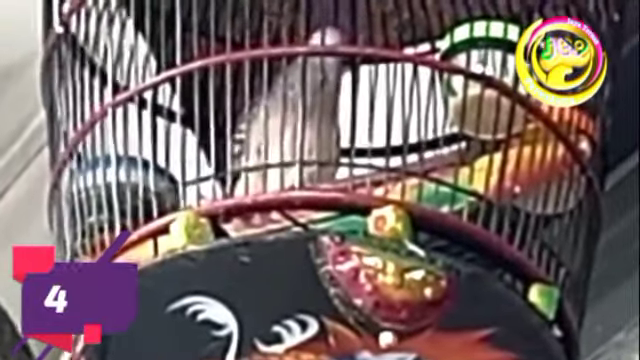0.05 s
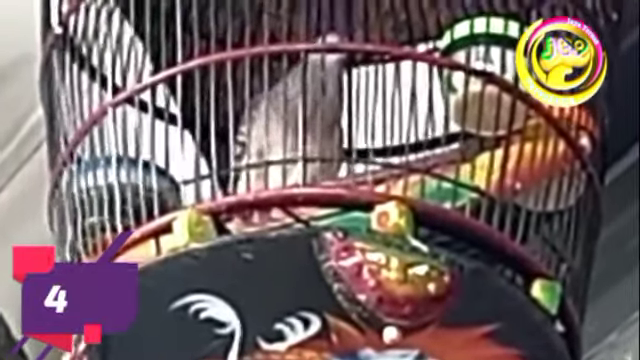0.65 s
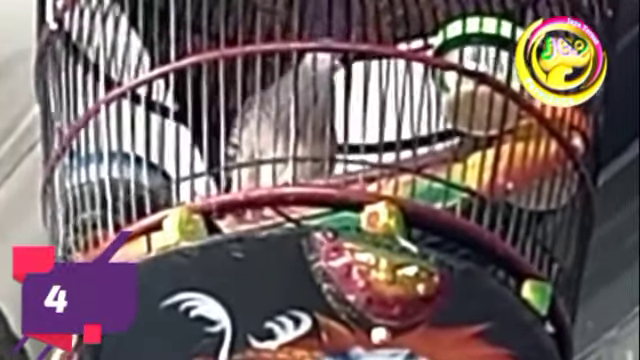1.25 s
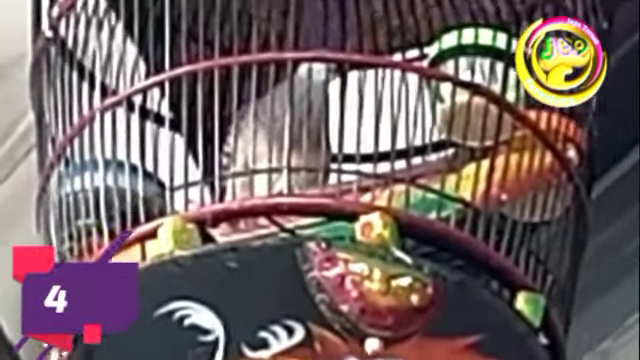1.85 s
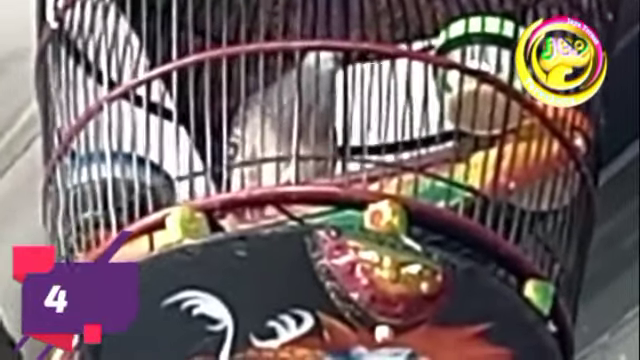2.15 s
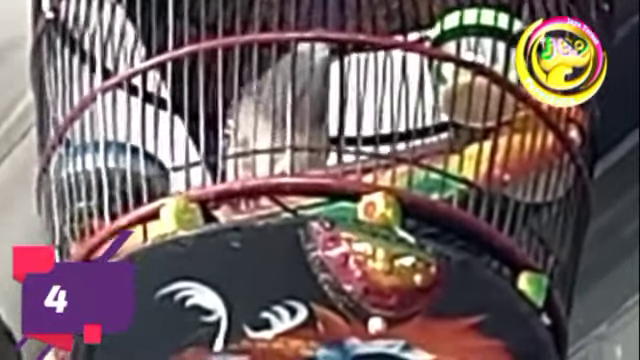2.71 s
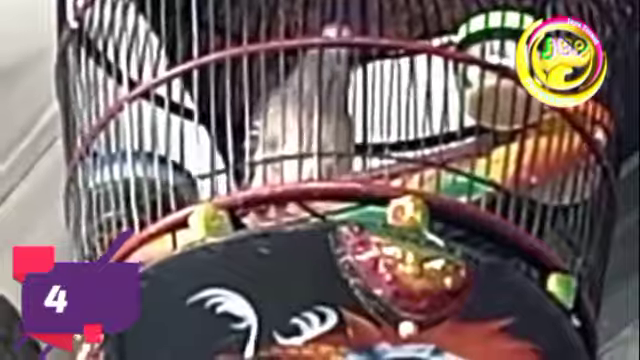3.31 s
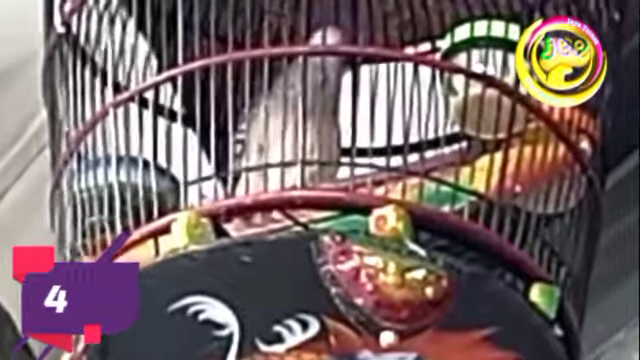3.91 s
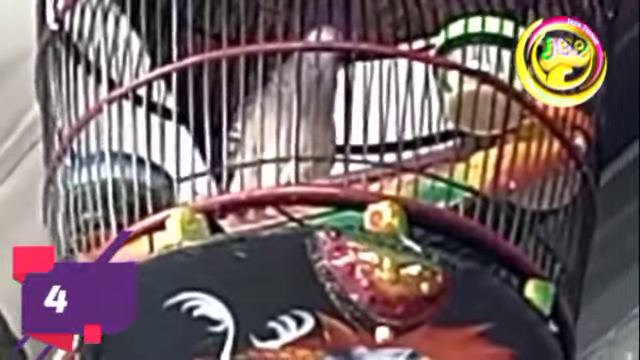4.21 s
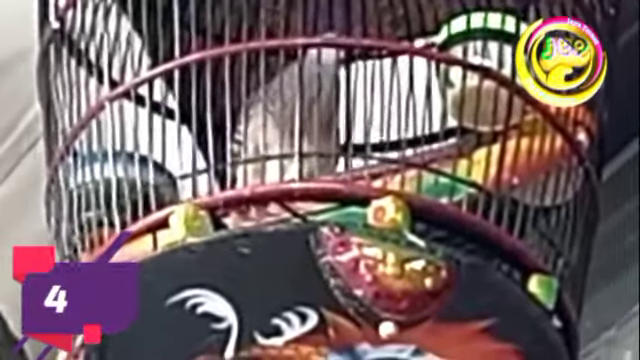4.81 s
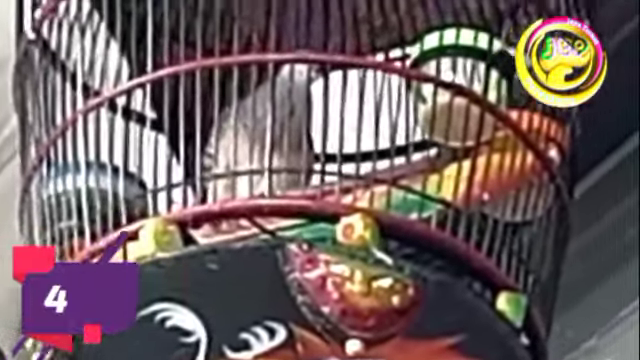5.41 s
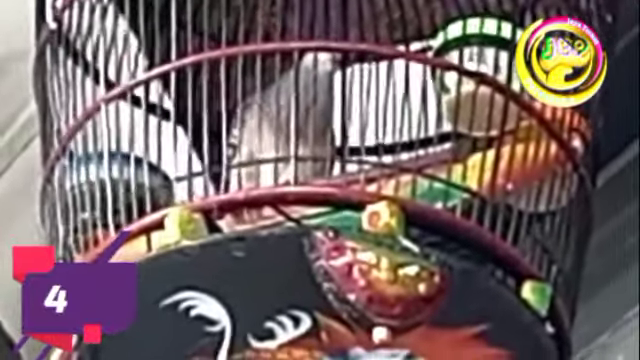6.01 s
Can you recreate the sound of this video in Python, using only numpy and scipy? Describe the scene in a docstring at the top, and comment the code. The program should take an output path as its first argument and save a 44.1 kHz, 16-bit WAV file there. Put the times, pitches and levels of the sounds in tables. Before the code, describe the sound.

Faint traffic and far-off bird calls fill a yard with a short echo. Close by, a dove in a cage gives a long, slightly overloaded coo, then a run of short, pure notes and a held, fading one. A second bird squawks harshly during the run and more softly afterwards, with light feather rustles in between. After a pause the cooing begins again.

```python
"""A hard-walled yard with traffic humming behind it. Close by, a caged dove sings a long rising coo,
six short notes and a drawn-out last one: nearly pure tones from a swollen throat, each opened by a
quick downward crack. The loudest coo overloads the left channel. A harsh bird squawks twice with both
sides of its syrinx, others call far off, and feathers rustle in the cage.
It all comes round every 3.9 s, and the level dips briefly once in each round."""
import sys
import numpy as np
from scipy import signal
from scipy.fft import rfft, irfft, next_fast_len
from scipy.io import wavfile
from scipy.ndimage import map_coordinates

SR = 44100
rng = np.random.default_rng(int(sys.argv[2]) if len(sys.argv) > 2 else 0)


def to_wav(s):
    """Save 16-bit WAV."""
    ch = np.atleast_2d(s).T  # columns
    pcm = np.round(np.clip(ch, -1, 1) * 32767)  # PCM
    wavfile.write(sys.argv[1], SR, pcm.astype(np.int16))


N = 271215
LOOP = 172032  # samples in one round
T = np.arange(LOOP) / SR
HZ = np.fft.rfftfreq(LOOP, 1 / SR)


def amp(db):
    """Decibels to gain."""
    return 10 ** (np.asarray(db) / 20)


def unit(x):
    """Scale to rms 1."""
    return x / np.sqrt(np.mean(x ** 2) + 1e-20)


def along(points, hz):
    """Read (freq_hz, value) points along a log frequency axis."""
    freqs, values = np.transpose(points)
    return np.interp(np.log(hz + 1), np.log(freqs + 1), values)


def curves(rows):
    """One automation curve for each column after the time."""
    times, *columns = np.transpose(rows)
    return [np.interp(T, times, column) for column in columns]


def wobble(rate, size=LOOP):
    """A smooth random curve, rate knots a second."""
    knots = rng.standard_normal(int(size * rate / SR) + 4)
    return map_coordinates(knots, [np.arange(size) * rate / SR])


def waver(x, depth, rate):
    """Randomly modulate a pitch or level curve; depth is a share of its value."""
    return x * (1 + depth * wobble(rate, len(x)))


def noise(spectrum):
    """Coloured noise of rms 1."""
    return unit(irfft(rfft(rng.standard_normal(LOOP)) * amp(along(spectrum, HZ))))


def wide(spectrum, apart_db):
    """Stereo noise: a shared part and a part of each side's own."""
    return unit(noise(spectrum) + amp(apart_db) * np.array([noise(spectrum), noise(spectrum)]))


def tone(hz):
    """A sine of rms 1 on a pitch curve."""
    return np.sqrt(2) * np.sin(2 * np.pi * np.cumsum(hz) / SR)


def gate(t, start, end, edge):
    """Open from start to end, with smooth edges."""
    return np.sin(np.pi / 2 * np.clip(np.minimum(t - start, end - t) / edge, 0, 1)) ** 2


def glide(length, pitches, edge_s):
    """Pitch and envelope of one syllable that passes evenly through its pitches."""
    t = np.arange(int(length * SR)) / SR
    return np.interp(t, np.linspace(0, length, len(pitches)), pitches), gate(t, 0, length, edge_s)


def add(track, start_s, sound):
    """Mix a sound into the track."""
    part = track[max(round(start_s * SR), 0):][:len(sound)]
    part += sound[:len(part)]


def puffs(rows):
    """Bell-shaped swells from (peak_s, width_s, level_db) rows."""
    return sum(amp(db) * np.exp(-(2 * (T - peak) / width) ** 2) for peak, width, db in rows)


def pan(left_db):
    """Channel gains for a source that leans left."""
    return amp([[left_db / 2], [-left_db / 2]])


# reverb time of the yard: freq_hz, t60_s
YARD_DECAY = [(200, 0.62), (800, 0.41), (2500, 0.3), (4500, 0.34), (5300, 0.24), (6500, 0.16), (7300, 0.17),
              (14000, 0.065)]


def yard(x):
    """The walls' diffuse reverb, different on each side, after a 10 ms pre-delay."""
    hz, t, spectra = signal.stft(rng.standard_normal((2, SR)), SR, nperseg=256)
    decay = amp(-60 * t / along(YARD_DECAY, hz)[:, None])
    tail = signal.istft(spectra * decay, SR, nperseg=256)[1]
    tail = np.pad(tail / np.linalg.norm(tail[0]), ((0, 0), (SR // 100, 0)))
    return irfft(rfft(x) * rfft(tail, LOOP))


def near_walls(x, latest_s=.017, count=14):
    """A handful of early reflections on each side."""
    delays = rng.uniform(.00091, latest_s, (2, count))
    signs = rng.choice([-1, 1], (2, count))
    echoes = [sum(sign * np.roll(x, int(delay * SR)) for delay, sign in zip(*side))
              for side in zip(delays, signs)]
    return np.array(echoes) / np.sqrt(count)


# colour of the outdoor air: freq_hz, gain_db
AIR_COLOUR = [(100, -22.5), (300, -7.5), (800, -10), (1800, -11), (3300, -19.5), (4200, -21.5), (5200, -29),
              (8500, -35), (15000, -38)]


def still_air():
    """A faint, wide bed of hiss."""
    return amp(-61) * wide(AIR_COLOUR, apart_db=-2.5)


# fader rides on the traffic: time_s, rumble_db, hum_db
TRAFFIC_RIDES = [(0.0, -105, -83), (0.09, -55, -47.5), (0.36, -50.5, -41), (0.46, -71, -62.5),
                 (0.85, -51, -42.5), (1.38, -54, -50.5), (1.66, -43.5, -49.5), (1.7, -52, -39),
                 (2.03, -56, -57), (2.08, -47.5, -59), (2.18, -43.5, -42), (2.68, -56.5, -51.5),
                 (2.73, -72, -71.5), (2.82, -53.5, -49), (3.84, -53, -46.5), (3.9, -63.5, -66)]
# colours of its rumble and its hum: freq_hz, gain_db
RUMBLE_COLOUR = [(20, -15.5), (45, -13.5), (60, -6), (75, 4), (105, -1.5), (160, -17.5), (300, -60),
                 (1000, -100)]
HUM_COLOUR = [(70, -31), (105, -8), (126, -6.5), (139, 6), (151, -9), (168, -2), (215, -15), (300, -22),
              (500, -51), (2000, -100)]


def traffic(trim_db=-1, flutter_db=1.5, rumble_floor_db=-65, hum_floor_db=-57):
    """Rumble and hum that swell and ebb over a steady floor."""
    rumble_db, hum_db = curves(TRAFFIC_RIDES)
    rumble_level = amp(rumble_db + trim_db - flutter_db * wobble(14)) + amp(rumble_floor_db)
    rumble = rumble_level * wide(RUMBLE_COLOUR, apart_db=-12)
    hum_level = amp(hum_db + trim_db - flutter_db * wobble(4.7)) + amp(hum_floor_db)
    return rumble + hum_level * wide(HUM_COLOUR, apart_db=-13)


# low bumps: peak_s, width_s, level_db
LOW_BUMPS = [(3.482, 0.18, -40.5), (0.028, 0.11, -42.5)]


def bumps():
    """Two soft swells of dark noise."""
    dark = noise([(40, -6), (150, 6), (300, -6.5), (700, -21), (4000, -37), (12000, -60.5)])
    return puffs(LOW_BUMPS) * dark


# a far dove's notes: start_s, length_s, level_db
FAR_DOVE = [(0.133, 0.29, -41), (0.938, .075, -44), (1.272, 0.34, -43), (2.383, .26, -41),
            (3.739, 0.094, -49)]
# far whistles: start_s, length_s, pitch_hz, level_db
FAR_WHISTLES = [(0.024, 0.046, 2303, -50), (0.071, 0.085, 1104, -47.5), (0.13, 0.022, 1752, -42),
                (.545, 0.065, 2116, -51.5), (1.089, 0.051, 1362, -49.5), (1.114, 0.083, 1062, -51),
                (3.521, .12, 1707, -54.5)]


def far_birds(coo_hz=745.5, sag_hz_per_s=430, direct_db=-8, wet_db=-2):
    """Coos that sink and swell, level whistles and one hoarse rising chirp, all mostly reverb."""
    calls = np.zeros(LOOP)

    def call(start, length, pitches, db, rough, swell_db_per_s=0):
        hz, envelope = glide(length, pitches, edge_s=.018)
        level = amp(db + swell_db_per_s * T[:len(hz)]) * envelope
        add(calls, start, level * tone(waver(hz, rough, 400)))

    for start, length, db in FAR_DOVE:
        call(start, length, (coo_hz, coo_hz - sag_hz_per_s * length), db, rough=.039, swell_db_per_s=12)
    for start, length, hz, db in FAR_WHISTLES:
        call(start, length, (hz, hz), db, rough=.012)
    call(start=.706, length=.28, pitches=(3850, 4200), db=-61, rough=.036)  # the chirp
    return pan(left_db=6) * (amp(direct_db) * calls + amp(wet_db) * yard(calls))


# feather rustles: peak_s, width_s, level_db
RUSTLES = [(1.712, .018, -30), (1.725, .08, -45), (2.662, .035, -42.5), (3.02, .04, -63),
           (3.18, .07, -51.5)]
# their colour: freq_hz, gain_db
RUSTLE_COLOUR = [(300, -10.5), (1200, 5.5), (2700, -1), (4000, -11.5), (5500, -42), (9000, -46.5)]


def feathers(grain_db=4, wet_db=-2):
    """Short, grainy rustles in the cage."""
    rustle = puffs(RUSTLES) * unit(amp(grain_db * wobble(520)) * noise(RUSTLE_COLOUR))
    return pan(left_db=1) * (rustle + amp(wet_db) * yard(rustle))


# squawk syllables: start_s, length_s, pitch_hz, glide_hz, level_db, rasp_db
SYLLABLES = [(2.147, .048, 2810, 249.5, -11.5, -16), (2.194, .028, 2569, -200, -13.5, -1),
             (2.2, .075, 4479, 498.5, -23.5, 2.5), (2.227, .024, 4936, 398.5, -12, -12.5),
             (2.276, 0.043, 2468, 100, -15, -16), (2.301, .036, 4262, 150.5, -12, -18),
             (2.337, .027, 4474, 200, -13, -11.5), (3.634, .03, 2672, 780.5, -30, -23.5),
             (3.657, .08, 4355, -350, -31.5, -8.5), (3.683, .1, 2847, 154, -38.5, -1.5)]
# the beak's EQ, then the colours of the rasp and of the fizz on the loudest syllables: freq_hz, gain_db
BEAK_EQ = [(1600, -37.5), (2080, -17), (2380, 2), (5300, 3.5), (5900, -3.5), (6500, 7.5), (7300, -5),
           (8400, -2), (12000, -7.5)]
RASP_COLOUR = [(1700, -41.5), (2400, -11), (3300, 1.5), (5200, -3.5), (5900, -9.5), (6500, -5.5),
               (7200, -30), (10500, -29), (13000, -31), (16000, -45)]
FIZZ_COLOUR = [(4000, -36), (6400, 2.5), (7400, -11.5), (8400, -4), (9200, -9.5), (10200, 0), (13000, -5.5),
               (16000, -19.5)]
# reverb send, higher for the later, farther squawk: time_s, send_db
SQUAWK_SEND = [(2.4, -11.5), (3.6, -3)]


def squawker(arch_hz=133, twin_above_hz=701.6, twin_db=-7.5, rough=.5, jitter=.018):
    """The two sides of the syrinx sing rough twin whistles that jump between two registers."""
    voice, airflow, effort = np.zeros((3, LOOP))
    for start, length, pitch, glide_hz, db, rasp_db in SYLLABLES:
        arch = pitch + np.array([-glide_hz - arch_hz, arch_hz, glide_hz - arch_hz]) / 2
        hz, envelope = glide(length, arch, edge_s=.0015)
        hz = waver(hz, jitter, 900)
        level = amp(db) * waver(envelope, rough, 900) / np.hypot(1, rough)
        octave = amp(-11 - 20 * np.log2(pitch / 2800)) * tone(2 * hz)  # strong in the low register only
        twin = amp(twin_db) * tone(waver(hz + twin_above_hz, jitter, 900))
        add(voice, start, level * (tone(hz) + twin + octave))
        add(airflow, start, amp(rasp_db) * level)
        add(effort, start, level ** 2)
    rasp = airflow * unit(amp(2 * wobble(400)) * noise(RASP_COLOUR))
    fizz = amp(-10) * effort * noise(FIZZ_COLOUR)  # grows faster than the voice: the fizz rides only the loudest syllables
    voice = irfft(rfft(voice) * amp(along(BEAK_EQ, HZ))) + rasp + fizz
    direct = amp(-4.5) * np.array([voice, np.roll(voice, -(SR // 20000))])
    early = amp(-5) * near_walls(voice)
    reverb = yard(amp(curves(SQUAWK_SEND)[0]) * voice)
    return pan(left_db=3) * (direct + early + reverb)


ATTACK_S, RELEASE_S = .026, .038
HOLD_S, FADE_DB_PER_S = .13, 28  # a held note runs out of air
SCOOP_HZ, SCOOP_S = 60.2, .013  # each note rises into its pitch from below
SAG_HZ_PER_S2, DROOP_HZ = 125, 39  # it sags ever faster, and droops as it closes
LEAP_S, LEAP_RISE_S = 1.337, .021  # the first note breaks into a loud upper register
HIGH_HZ, HIGH_DB, HIGH_SAG_HZ_PER_S = 911, 0, 160
SINK_S, SINK_WIDTH_S = 1.499, .012  # and slides back out of it
# membrane buzz on the attack, then through the held note: harmonic, level_db
ATTACK_BUZZ = [(3, -4), (4, 3.5), (5, -9), (6, -10), (8, -22)]
SUSTAIN_BUZZ = [(3, -61), (5, -59), (6, -62)]


def coo(start, length, pitch, db, buzz_db, octave_db=-45, breath_db=-35, buzz_t60_s=.19):
    """One nearly pure note and its breath envelope: the swollen throat keeps the overtones down."""
    t = np.arange(int(length * SR)) / SR
    now = start + t
    closing = gate(t, -np.inf, length, RELEASE_S)
    envelope = gate(t, 0, np.inf, ATTACK_S) * closing
    sink = (1 - np.tanh((now - SINK_S) / (2 * SINK_WIDTH_S))) / 2
    high = gate(now, LEAP_S, np.inf, LEAP_RISE_S) * sink  # blend into the upper register
    unsteady = 1 - high / 2  # the upper register is the steadier one
    tremor = 1 + .0078 * unsteady * wobble(150, len(t))
    bend = SCOOP_HZ * np.exp(-t / SCOOP_S) + SAG_HZ_PER_S2 * t ** 2 + DROOP_HZ * (1 - closing)
    high_hz = HIGH_HZ - HIGH_SAG_HZ_PER_S * (now - LEAP_S)
    hz = pitch + high * (high_hz - pitch) - bend
    low_db = db - FADE_DB_PER_S * np.maximum(t - HOLD_S, 0)
    level = envelope * amp(low_db + high * (HIGH_DB - low_db))
    level = waver(level, .045 * (1 - high), 180)  # low notes shimmer
    # the octave is rough, and grows and fades much less than the note itself
    octave = amp(octave_db) * np.sqrt(level / (level + amp(-26))) * tone(waver(2 * hz, .01, 250))
    # the membranes buzz for a moment after the opening crack, then only faintly
    flash = amp(buzz_db - 60 * t / buzz_t60_s) * gate(t, 0, length, .0066)
    buzz_hz = (pitch - bend / 2) * tremor
    buzz = flash * sum(amp(part_db) * tone(k * buzz_hz) for k, part_db in ATTACK_BUZZ)
    buzz += level * sum(amp(part_db) * tone(k * hz) for k, part_db in SUSTAIN_BUZZ)
    return level * tone(hz * tremor) + octave + buzz, level * unsteady * amp(breath_db)


# evenly spaced points of a crack's fall: pitch_hz
CRACK_FALL = [1090, 1085.7, 947, 731, 574, 666]


def crack(length, db):
    """A quick, rough drop in pitch: the membranes beat unevenly until the note locks in."""
    hz, envelope = glide(length, CRACK_FALL, edge_s=.018)
    return amp(db) * waver(envelope, .45, 450) * tone(waver(hz, .072, 590))


# the dove's song: start_s, crack_s, note_s, pitch_hz, note_db, crack_db, buzz_db
SONG = [(1.22, .038, 0.37, 803.6, -8.5, -13.5, -46), (1.644, .026, 0.066, 807, -5.5, -10, -49),
        (1.828, 0.03, 0.076, 792, -6, -11.5, -43.5), (1.985, .027, 0.079, 794.6, -5, -10.5, -44.5),
        (2.15, .035, .09, 779, -9.5, -15, -48), (2.338, .028, 0.097, 787.4, -6, -14, -42.5),
        (2.545, .031, .11, 781, -6, -12.5, -41.5), (2.78, .029, 0.48, 782.9, -7, -12.5, -44)]
# colour of its breath: freq_hz, gain_db
BREATH_COLOUR = [(100, -14.5), (280, 1.5), (480, -6.5), (800, -9), (1250, -7.5), (1600, -2.5), (2100, -22),
                 (4500, -32), (8000, -59)]
# the direct sound pans as the dove turns its head: time_s, left_minus_right_db
HEAD_TURNS = [(1.27, 8.5), (1.36, 8.5), (1.47, 4), (1.68, 10), (2.92, 10.5), (3.1, 20), (3.19, -2.5),
              (3.3, 19.5)]


def dove(lock_share=.62, note_wet_db=-18, crack_wet_db=-11, crack_early_db=-5, crack_direct_db=-4):
    """Each note cracks downward, then settles on the throat's pitch; the walls carry it into the next."""
    notes, breath, cracks = np.zeros((3, LOOP))
    for start, crack_s, note_s, pitch, note_db, crack_db, buzz_db in SONG:
        lock_s = start + lock_share * crack_s  # the note takes over partway through its crack
        voice, airflow = coo(lock_s, note_s, pitch, note_db, buzz_db)
        add(notes, lock_s, voice)
        add(breath, lock_s, airflow)
        add(cracks, start, crack(crack_s, crack_db))
    breath *= noise(BREATH_COLOUR)
    left = notes + amp(crack_direct_db) * cracks + breath
    right = amp(-curves(HEAD_TURNS)[0]) * np.roll(left, -(SR // 8000))  # mostly fainter, a touch earlier
    reverb = amp(note_wet_db) * yard(notes) + amp(crack_wet_db) * yard(cracks + breath)
    early = amp(crack_early_db) * near_walls(cracks)
    return np.array([left, right]) + pan(left_db=4) * (reverb + early)


def scene(dip_s=3.495, dip_length_s=.034, dip_db=-24):
    """One round of all sources with a brief dip in level, looped."""
    birds = dove() + squawker() + far_birds() + feathers()
    bed = pan(left_db=3.7) * (traffic() + bumps() + still_air())
    dip = amp(dip_db * gate(T, dip_s, dip_s + dip_length_s, .004))
    return ((birds + bed) * dip)[:, np.arange(N) % LOOP]


def record(dry, ceiling=.98, top_hz=15700):
    """A hard clip just under full scale, then a brick-wall low-pass."""
    clipped = np.clip(dry, -ceiling, ceiling)
    size = next_fast_len(N + SR // 2)
    passband = np.fft.rfftfreq(size, 1 / SR) < top_hz
    return irfft(rfft(clipped, size) * passband, size)[:, :N]


dry = scene()
out = record(dry)
to_wav(out)
```